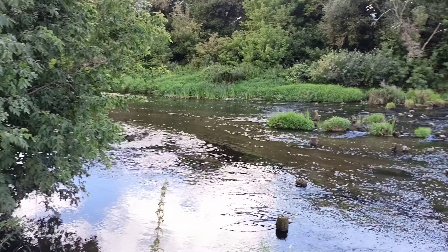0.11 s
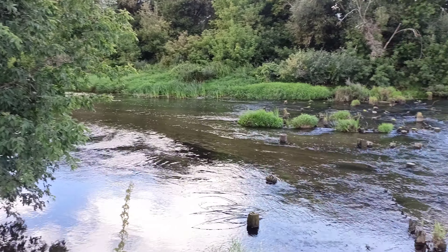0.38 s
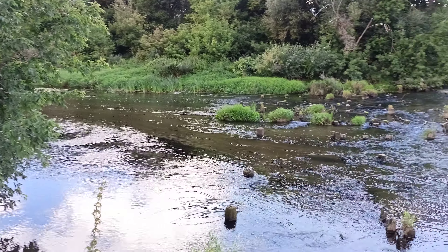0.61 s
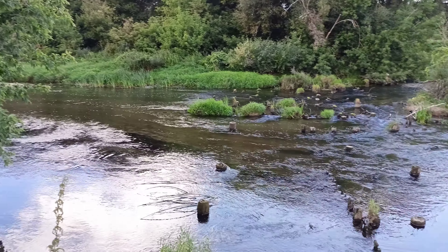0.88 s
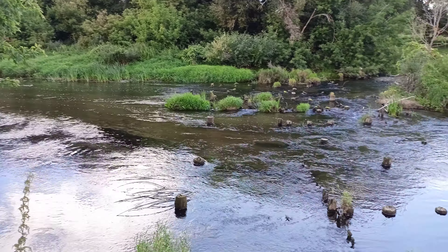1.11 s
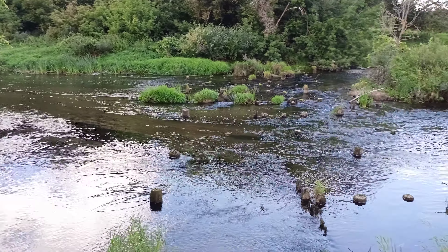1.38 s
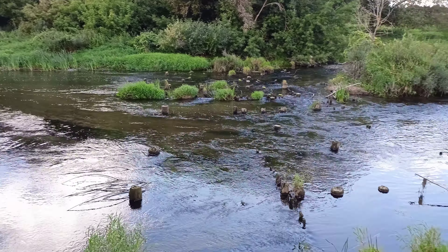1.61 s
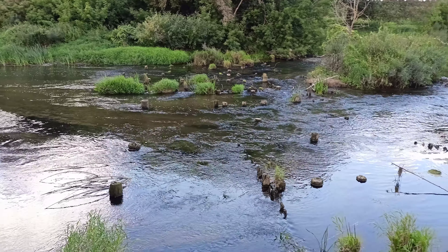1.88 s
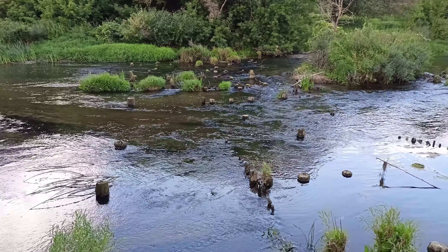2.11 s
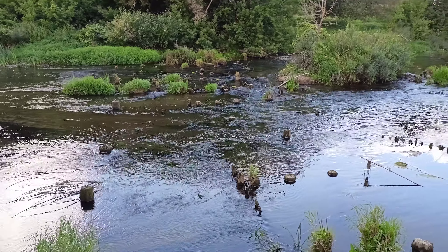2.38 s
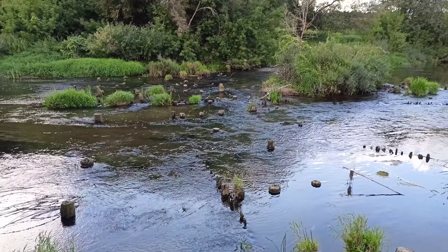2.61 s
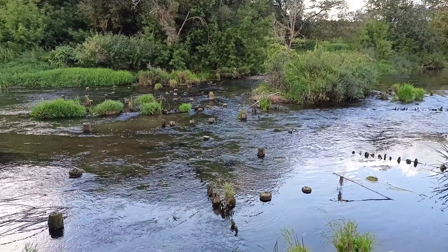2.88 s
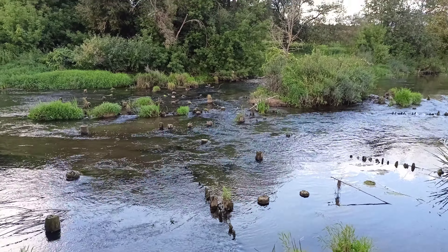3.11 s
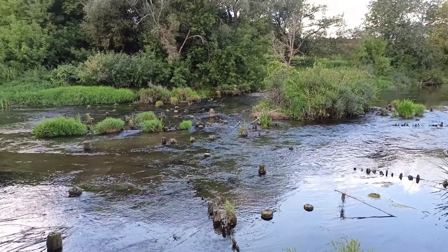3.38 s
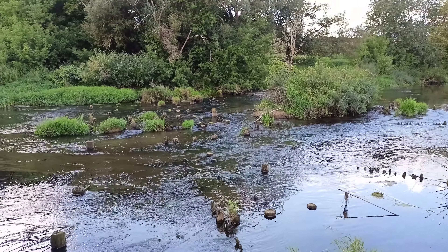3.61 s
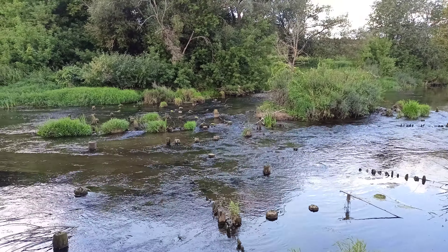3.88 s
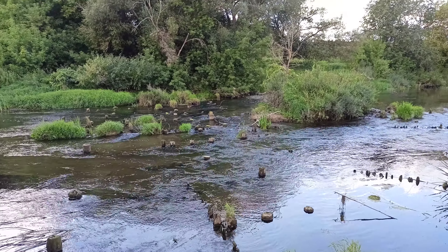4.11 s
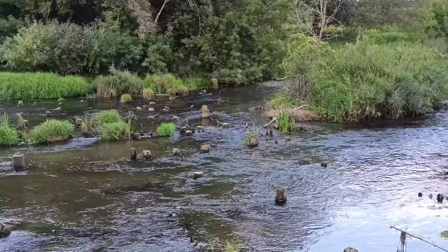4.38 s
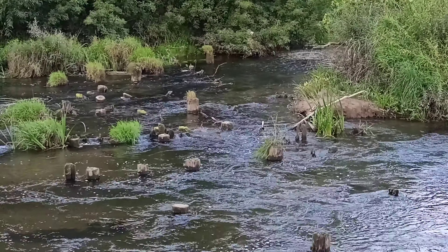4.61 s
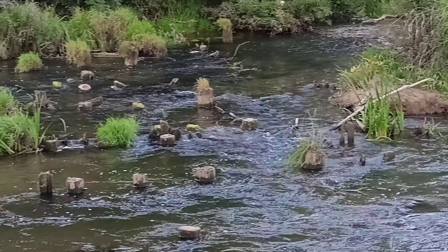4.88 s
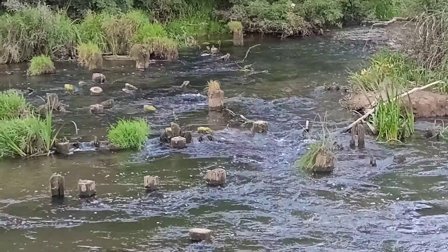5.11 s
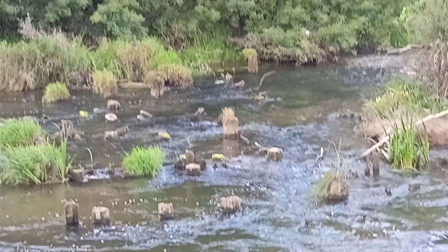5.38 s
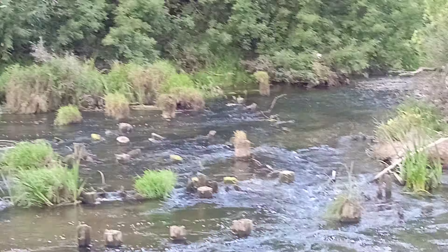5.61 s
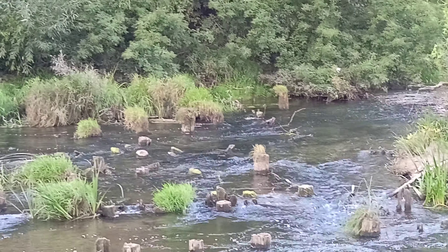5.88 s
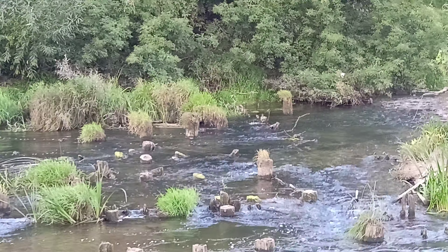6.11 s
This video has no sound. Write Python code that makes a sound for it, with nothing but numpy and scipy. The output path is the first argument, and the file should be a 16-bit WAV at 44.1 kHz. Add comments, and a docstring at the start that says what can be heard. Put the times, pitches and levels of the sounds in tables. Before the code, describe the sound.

A shallow river ripples continuously over stones and old wooden piles, heard outdoors from the bank through a small hand-held microphone. From 0 to 2.4 seconds the water is even, mid-toned and slightly muffled, full of small gurgling bubbles, over faint hiss and low hand rumble; a soft knock comes at 0.3 and tiny taps around 1.6 to 1.9. From 2.4 to 3.0 the grip changes: a dense cluster of dull thumps, rubbing and dry clicks, strongest near 2.6. At 3.1 a sharp bump leads into a short stuttering slide until about 3.35, with a click at 3.43. The water then opens, brighter with fine spray. A small group of bumps falls at 4.0 to 4.2, and a light knock at 5.0. The tone becomes duller again after 5.3, with faint soft bumps, then low thuds at 6.1 to 6.2 as it ends mid-flow.

```python
"""A shallow river ripples over stones and wooden piles, heard from the bank by a small hand-held microphone.
The water is noise for far ripples plus ringing bubbles; turning and re-gripping the hand blends its colours.
Dense tiny bursts make the spray, over filtered hiss. The hand adds band-passed rumble and rubbing slips;
fingers bump the casing (a pressure pulse with damped resonances) and tick on it (short noise cracks)."""
import sys
import numpy as np
from scipy import signal
from scipy.fft import rfft, irfft
from scipy.io import wavfile
from scipy.ndimage import uniform_filter1d

SR = 44100
rng = np.random.default_rng(int(sys.argv[2]) if len(sys.argv) > 2 else 0)


def wav_record(signal):
    """Record a signal, one row per channel, as 16-bit PCM in the file named by sys.argv[1]."""
    frames = np.transpose(np.atleast_2d(signal))
    bounded = np.clip(frames, -1, 1)
    # unit amplitude maps onto the largest positive 16-bit level
    quanta = np.round(bounded * 32767).astype(np.int16)
    wavfile.write(sys.argv[1], SR, quanta)


def ratio_of_db(decibels):
    """Turn decibels (scalar or array-like) into linear amplitude factors; 0 dB maps to 1."""
    return 10 ** (np.asarray(decibels, float) / 20)


N = 275184  # samples, 6.24 s


def rms_one(x):
    """Normalisation of power: scale to rms 1."""
    return x / np.sqrt(np.mean(x ** 2) + 1e-20)


def in_time(rows):
    """Linear interpolation: table columns joined by straight lines, one value a sample."""
    s, *columns = np.transpose(rows)
    return [np.interp(np.arange(N) / SR, s, column) for column in columns]


def colour(x, spectrum):
    """Spectral shaping: weight a flat sound by levels joined over log frequency, then scale to rms 1."""
    hz, db = np.transpose(spectrum)
    bin_hz = np.arange(N // 2 + 1) * SR / N + 1  # the added 1 Hz avoids log(0)
    weight = ratio_of_db(np.interp(np.log(bin_hz), np.log(hz), db))
    return rms_one(irfft(rfft(x) * weight, N))


def band(x, low_hz, high_hz):
    """Butterworth band-pass: maximally flat passband."""
    return signal.sosfilt(signal.butter(2, [low_hz, high_hz], "band", fs=SR, output="sos"), x)


def low_pass(x, order, cut_hz):
    """Butterworth low-pass: maximally flat below the cut."""
    return signal.sosfilt(signal.butter(order, cut_hz, fs=SR, output="sos"), x)


def drift(rate_hz):
    """Slow random fluctuation: noise through two equal poles at rate_hz, spread 1."""
    step = 40  # samples between computed points
    pole = np.exp(-2 * np.pi * rate_hz * step / SR)
    noise = rng.standard_normal(N // step + 2002)
    slow = signal.lfilter([1], [1, -2 * pole, pole * pole], noise)[2000:]  # skip the build-up
    return np.interp(np.arange(N) / step, np.arange(len(slow)), rms_one(slow))


def ring(clicks, hz, t60_s):
    """Damped resonance: a unit click sets a decaying sine of initial height 1 ringing."""
    radius, angle = ratio_of_db(-60 / (t60_s * SR)), 2 * np.pi * hz / SR
    poles = [1, -2 * radius * np.cos(angle), radius * radius]
    return signal.lfilter([0, np.sin(angle)], poles, clicks + 1e-18)


def bubbles(low_hz, high_hz, cycles, rise, spread_db, count):
    """Bubble resonance: trapped air rings briefly, climbing in pitch near the surface; flat long-term spectrum."""
    out = np.zeros(N + SR)
    for when, pitch, size, sign in rng.random((count, 4)):
        hz = low_hz * (high_hz / low_hz) ** pitch
        turns = np.arange(int(3 * cycles * SR / hz)) * hz / SR
        at = int(when * N)
        height = ratio_of_db(-spread_db * np.log(1 - .995 * size)) * np.sign(sign - .5)
        decay = np.exp(-turns / cycles * 2)
        phase = 2 * np.pi * turns * (1 + rise * turns / cycles)
        out[at:at + len(turns)] += height * decay * np.sin(phase)
    bins = rfft(out[:N])
    smooth = np.sqrt(uniform_filter1d(np.abs(bins) ** 2, size=600))
    bin_hz = (np.arange(len(bins)) + 1) * SR / N
    centre_hz = np.sqrt(low_hz * high_hz)
    inside = np.abs(np.log(bin_hz / centre_hz)) < np.log(high_hz / low_hz) / 2
    return irfft(bins / smooth * inside, N) * np.sqrt(N)


def hiss():
    """Stationary noise: far treble and microphone hiss, its level wavering slightly."""
    # hiss spectrum before scaling to rms 1: f/Hz, relative level/dB
    hiss_spectrum = [(2350, -33), (4000, -2.5), (4590, -1.5), (5420, 2.5), (7180, -3.5), (7780, -8),
                     (8290, -5), (9730, -7), (11300, -6.5), (12400, -12), (15100, -10), (15800, -11.5)]
    # hiss level: t/s, level/dB
    hiss_course = [(0.0, -65.5), (0.44, -66.5), (1.96, -65), (2.51, -64), (2.7, -66), (3.0, -64.5)]
    level_db = in_time(hiss_course)[0] + .5 * drift(19)
    return ratio_of_db(level_db) * colour(rng.standard_normal(N), hiss_spectrum)


def slides():
    """Sliding friction of skin on casing: rumble, rubbing and swish gains with rise, hold, exponential fall."""
    # skin slides: start t/s, length (rise and hold)/s, rumble level/dB, rubbing level/dB, swish level/dB
    slide_rows = [(2.4, 0.089, -46, -47, -68), (2.526, 0.14, -55, -42, -89), (2.617, 0.048, -50, -44, -60),
                  (2.786, 0.11, -44, -42.5, -66), (2.94, 0.14, -49, -54, -86),
                  (3.113, .215, -38.5, -45, -85), (3.37, 0.13, -48, -48, -78), (3.99, .21, -51.5, -63, -83),
                  (5.29, 0.46, -53.5, -75, -85), (6.083, 0.11, -59, -47, -88)]
    rise_s, release_s = 0.016, 0.024
    t, gains = np.arange(N) / SR, np.zeros((3, N))
    for s, length_s, *levels_db in slide_rows:
        rise = np.clip((t - s) / rise_s, 0, 1)
        fall = np.exp(-np.clip(t - s - length_s, 0, 1) / release_s)
        gains += ratio_of_db(np.array(levels_db))[:, None] * rise * fall
    return gains


def spray():
    """Impulsive noise: dense tiny bursts make spray once the port is free, and the swish of sliding skin."""
    # spectrum of fine spray before scaling to rms 1: f/Hz, relative level/dB
    spray_spectrum = [(2350, -8), (4000, -5.5), (4490, -10), (5240, -2), (5980, -1.5), (7470, -5.5),
                      (8630, -10.5), (10400, -13), (12500, -22), (15000, -24), (15800, -16)]
    # spray reaching the port as the hand uncovers it: t/s, level/dB
    spray_course = [(2.95, -83), (3.16, -59), (3.3, -58), (3.44, -65), (3.58, -60), (3.7, -55.5),
                    (4.0, -56.5), (5, -58), (5.25, -55), (5.5, -60.5), (6.24, -61.5)]
    sizes = ratio_of_db(1.7 * rng.exponential(1, N))
    bursts = sizes * rng.standard_normal(N) * (rng.random(N) < .3)
    gain = ratio_of_db(in_time(spray_course)[0]) + slides()[2]
    return gain * ratio_of_db(0.47 * drift(12)) * colour(bursts, spray_spectrum)


def hand():
    """Contact noise: lumpy rumble of muscle and air, and friction of skin in dense small slips."""
    # the resting hand: t/s, rumble level/dB, rubbing level/dB
    rest_course = [(0, -51.5, -59), (.5, -52.5, -54.5), (.9, -56.5, -53.5), (1.4, -53, -56),
                   (2.2, -57, -57), (3.5, -52.5, -54), (4.7, -53, -54), (5.1, -55, -59.5),
                   (6.24, -52, -47.5)]
    rumble_gain, rub_gain = ratio_of_db(np.array(in_time(rest_course))) + slides()[:2]
    lumpy = rng.standard_normal(N) * ratio_of_db(3.7 * drift(7.2))
    rumble = rms_one(band(lumpy, 37, 196))
    slipping = rng.random(N) < 1000 / SR  # about 1000 slips a second
    slips = ratio_of_db(3.5 * drift(30)) * rng.standard_normal(N) * slipping
    rubbing = rms_one(band(band(slips, 110, 665), 106, 610))
    return rumble_gain * rumble + rub_gain * rubbing


def ticks():
    """Broadband transients: short noise cracks, bright on top with a duller body, trailing a faint scuff."""
    # dry ticks, levels before filtering: t/s, top level/dB, body level/dB, centre f/Hz
    tick_rows = [(1.5635, -47, -60, 7000), (1.95, -56, -60, 13500), (2.403, -40, -22, 6940),
                 (2.489, -51, -60, 14500), (2.593, -42, -60, 5900), (2.6351, -27, -9, 5100),
                 (2.6367, -22, -3, 5300), (2.66, -42, -27, 6000), (2.8123, -55, -34, 3600),
                 (2.9007, -34, -23, 6460), (3.1055, -34, -21, 5000), (3.4293, -35, -13, 3740),
                 (3.5848, -42, -60, 4000), (4.018, -43, -45, 8000)]
    crack_ms = 0.25  # time constant
    scuff_db, scuff_t60_s = -11, 0.037
    snap_db = 12  # the first sample of a crack, over its noise
    dull = 1.9  # low-pass of the top, times the centre frequency
    out, t = np.zeros(N), np.arange(2200) / SR
    fall = np.exp(-t * 1000 / crack_ms)
    scuff = ratio_of_db(scuff_db - 60 * t / scuff_t60_s)
    noises = np.sign(rng.standard_normal((len(tick_rows), 2200)))
    for (s, top_db, body_db, hz), noise in zip(tick_rows, noises):
        noise[0] = ratio_of_db(snap_db)
        top = ratio_of_db(top_db) * noise * (fall + scuff)
        bright = band(top, hz / 1.5, min(hz * 1.5, 17000))
        bright = low_pass(bright, 1, min(hz * dull, 17000))
        body = ratio_of_db(body_db) * band(noise * fall, 1200, 2600)
        at = round(s * SR)
        out[at:at + 2200] += bright + body
    return out


def catches(count):
    """Stick-slip: a slide stutters in small bumps of either direction, unevenly spaced."""
    start_s, length_s = 3.165, .185
    typical_ms, spread_db = 0.92, 5  # contact time varies from half to one and a half times this
    typical_db = np.array((-23, -27, -36))  # push, mount, casing
    rows = []
    for k, (late, side, soft, size) in enumerate(rng.random((count, 4))):
        s = start_s + length_s * (k + late) / count
        levels_db = typical_db + spread_db * (2 * size - 1)
        rows.append((s, side - .5, typical_ms * (.5 + soft), *levels_db))
    return rows


def bumps():
    """Impulse response: a soft push of pressure; the mount swings back against it and the casing is knocked."""
    # finger bumps, levels before the flesh dulls them:
    # t/s, direction (sign), contact (time to peak)/ms, push level/dB, mount level/dB, casing level/dB
    bump_rows = [(0.3128, -1, 2, -60, -21.5, -29), (1.8443, 1, 0.2, -60, -36, -58),
                 (1.8662, 1, 0.18, -50, -37, -39), (1.9152, 1, 0.31, -58, -30, -50),
                 (2.403, 1, 0.18, -57, -33, -28), (2.4182, -1, 1.8, -34, -27, -49),
                 (2.511, -1, 1.8, -18, -12, -22), (2.5145, -1, 0.92, -64, -6.5, -9.5),
                 (2.5309, -1, 1.5, -17, -9, -37), (2.551, -1, 1, -57, -23, -26),
                 (2.575, 1, 2.2, -13.5, -3, -17.5), (2.618, -1, 4.2, -31, 1.5, -60),
                 (2.6349, -1, 0.24, -6.5, -23, -60), (2.6373, -1, 1.3, -8.5, -6, 2.5),
                 (2.6536, 1, 1.47, -60, -8, -60), (2.658, -1, 5.1, -10, -60, -28),
                 (2.6882, -1, 0.83, -25, -18, -54), (2.7581, -1, 1, -29, -10, -15.5),
                 (2.8015, 1, 3.3, -21, 1, -19.5), (2.828, -1, 1.4, -28, -15, -40),
                 (2.859, -1, 0.74, -30, -17, -18.5), (2.9, -1, 0.81, -45, -25, -23.5),
                 (2.9388, -1, 1.1, -60, -15.5, -19), (2.963, -1, 0.94, -30, -9, -17.5),
                 (3.105, -1, 0.27, -5, -9, -9), (3.429, -1, 0.13, -15.5, -20, -10.5),
                 (3.475, -1, 2.2, -50, -66, -25), (4.0172, 1, 2, -20, -37, -21),
                 (4.0513, -1, 0.71, -25, -60, -24.5), (4.061, 1, 3.5, -27, -19, -22.5),
                 (4.097, -1, 0.28, -16, -29, -24), (4.1142, 1, 0.23, -34, -40, -24),
                 (4.1855, -1, 0.2, -29, -36, -36), (4.195, 1, 1, -32, -22.5, -43),
                 (4.9775, -1, 0.94, -42, -12.5, -23), (5.3799, 1, 0.62, -36, -27, -62),
                 (5.585, -1, 3.5, -26, -60, -60), (5.6318, -1, 2.1, -29, -60, -30),
                 (5.815, -1, 1.5, -60, -11, -60), (6.081, -1, 0.93, -44, -21, -30),
                 (6.095, -1, 1.5, -30, -6, -16.5), (6.1802, -1, 2, -13.5, 2, -18),
                 (6.2363, -1, 0.79, -15.5, -47, -60)]
    # casing resonances, signs alternate: f/Hz, level relative to the knock/dB, t60/s
    casing_modes = [(578, 5, 0.0034), (326, -4, 0.015), (795, -26, 0.0058)]
    mount_hz, mount_t60_s = 129.3, 0.031
    push, shake, knock = np.zeros((3, N + 1500))
    t_ms = np.arange(1500) * 1000 / SR
    for s, direction, contact_ms, push_db, mount_db, casing_db in bump_rows + catches(count=10):
        at, sign = round(s * SR), np.sign(direction)
        shape = sign * t_ms / contact_ms * np.exp(1 - t_ms / contact_ms)
        push[at:at + 1500] += ratio_of_db(push_db) * shape
        shake[at:at + 1500] -= ratio_of_db(mount_db) * shape / abs(shape.sum())
        knock[at] -= ratio_of_db(casing_db) * sign
    casing = sum((-1) ** k * ratio_of_db(db) * ring(knock, hz, t60_s)
                 for k, (hz, db, t60_s) in enumerate(casing_modes))
    body = push + ring(shake, mount_hz, mount_t60_s) + casing
    return low_pass(body[:N], 4, 1250)  # Hz; flesh dulls the blow


def water():
    """Superposition: countless far ripples blur to noise, nearer bubbles stand out; turning blends the colours."""
    # water spectra in four ways of holding, with the ripples of echoes off hand and casing,
    # each before scaling to rms 1: f/Hz, relative level/dB
    hold_spectra = [
        [(140, -46), (230, -40), (306, 0), (386, -4), (495, -11), (771, 0.5), (1130, -9), (1280, -16),
         (2070, -14.5), (2370, -32), (2720, -15), (3190, -34), (4400, -35), (5720, -68), (9680, -120)],
        [(140, -32), (230, -14), (257, -14.5), (291, -2), (396, -3), (454, -4.5), (699, 2), (1060, -7),
         (1430, -5.5), (1680, -13), (2020, -12), (2820, -15.5), (4400, -42.5), (5720, -67), (9680, -120)],
        [(240, -9), (400, -2), (448, -6.5), (621, -1), (835, 0.5), (906, -4), (1030, -12.5), (1360, -2),
         (1570, -14), (1830, -6.5), (2070, -13.5), (2440, -6), (2760, -10.5), (3030, -9.5), (4600, -36.5),
         (5980, -58), (10100, -120)],
        [(140, -41), (230, -33), (307, -4), (415, -7.5), (619, -0.5), (836, -0.5), (1100, -13), (1220, -7),
         (1350, -6), (1550, -18), (1770, -3.5), (2170, -12.5), (2820, -6.5), (3450, -21.5), (4600, -41),
         (5980, -58), (10100, -120)],
    ]
    # course of the grip: t/s, place among the holds (0-3), water level before the blend/dB
    grip_course = [(0, 0.5, -45), (.6, 0.29, -43.5), (1.0, 0.85, -43.5), (1.7, 1.09, -44.5),
                   (2.3, 0.94, -43.5), (2.9, 1.3, -44), (3.05, 1.33, -44), (3.2, 1.3, -40.5),
                   (3.4, 1.9, -44), (3.75, 1.8, -43.5), (3.95, 3, -42.5), (4.5, 3.14, -42),
                   (5.05, 3.05, -43), (5.3, 1.96, -44.5), (5.7, 1.4, -43.5), (6.24, 1.9, -45)]
    place, water_db = in_time(grip_course)
    blur = rng.standard_normal(N) * ratio_of_db(0.75 * drift(15))
    near = bubbles(260, 1500, cycles=11, rise=.06, spread_db=3, count=2200)
    fizz = bubbles(1500, 4200, cycles=14, rise=.04, spread_db=2, count=6000)
    flow = blur + ratio_of_db(-3.5) * near + ratio_of_db(-2.5) * fizz
    blend = np.zeros(N)
    for k, spectrum in enumerate(hold_spectra):
        share = np.clip(1 - np.abs(place - k), 0, 1)  # linear crossfade between neighbouring holds
        blend += share * colour(flow, spectrum)
    return ratio_of_db(water_db) * blend


def scene():
    """Linear superposition: water, treble and handling reach one capsule."""
    return (hiss() + spray() + hand() + ticks() + bumps() + water())[None]


def top_cut(x):
    """Nothing passes above the cut-off."""
    return signal.sosfilt(signal.butter(12, 16850, fs=SR, output="sos"), x)


def record(dry):
    """Band limiting: a steep low cut smears each push into a falling wobble; circuit rumble joins; the top ends."""
    low_cut_hz, top_cut_hz, rumble_db = 66.5, 15765, -66
    x = signal.sosfilt(signal.butter(6, low_cut_hz, "high", fs=SR, output="sos"), dry)
    circuit = rms_one(band(band(rng.standard_normal(N), 38, 65), 26, 80))
    x = x + ratio_of_db(rumble_db) * circuit
    below_top = np.arange(N // 2 + 1) * SR / N < top_cut_hz
    mix = irfft(rfft(x) * below_top, N)
    return top_cut(mix)


dry = scene()
out = record(dry)
wav_record(out)
```